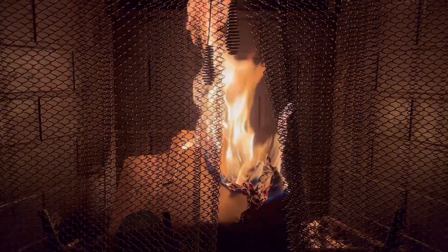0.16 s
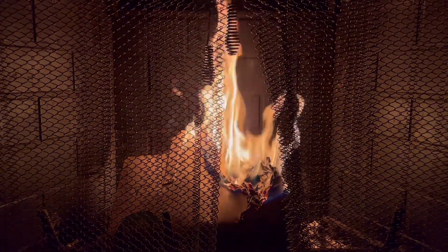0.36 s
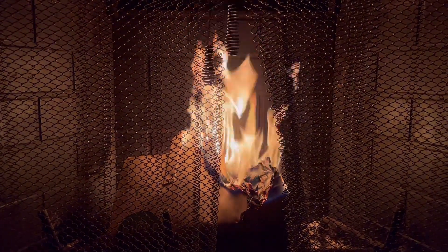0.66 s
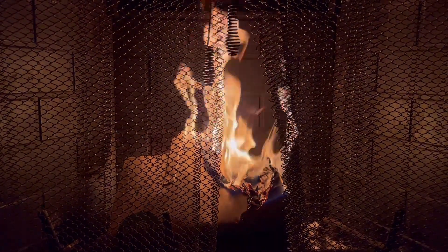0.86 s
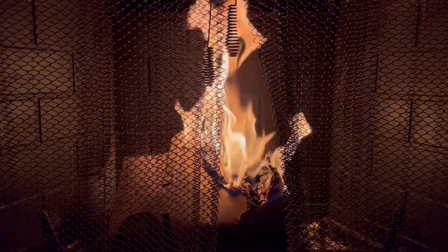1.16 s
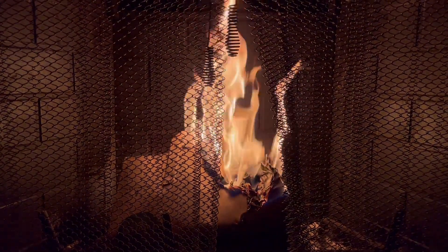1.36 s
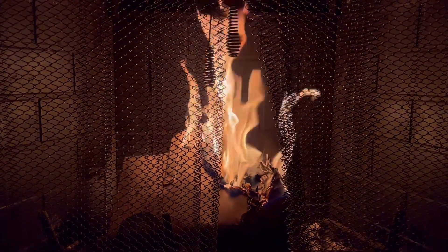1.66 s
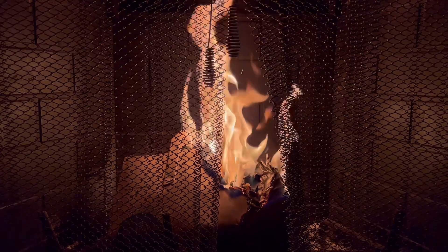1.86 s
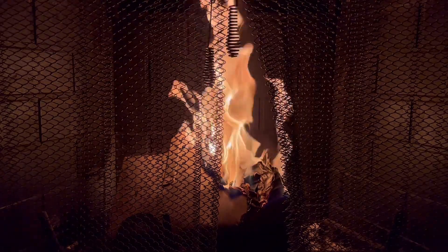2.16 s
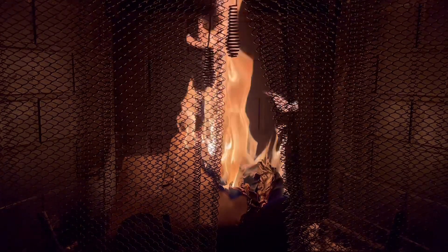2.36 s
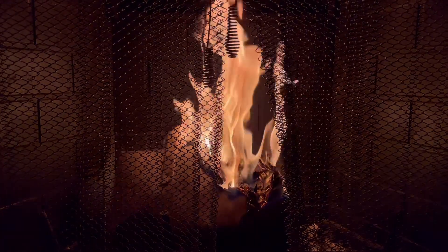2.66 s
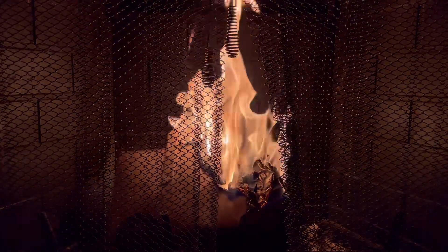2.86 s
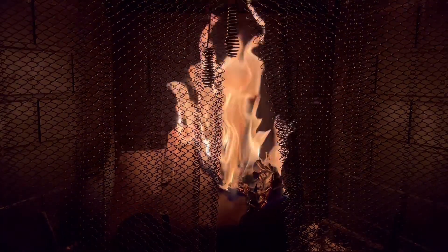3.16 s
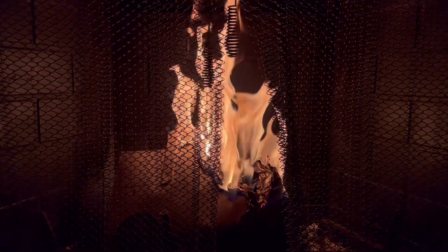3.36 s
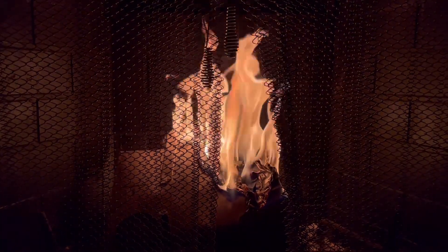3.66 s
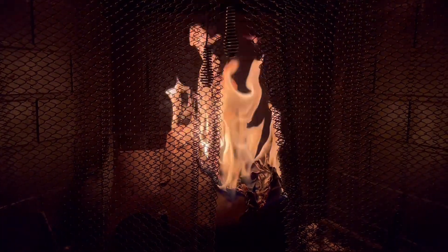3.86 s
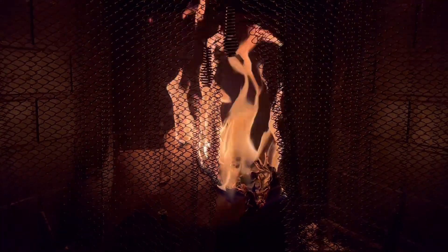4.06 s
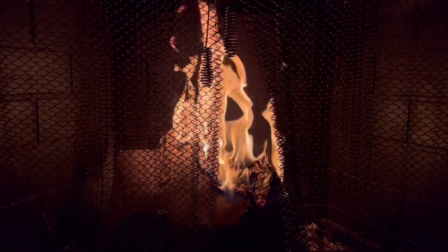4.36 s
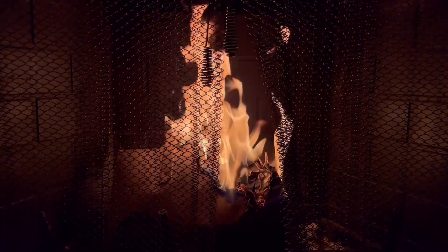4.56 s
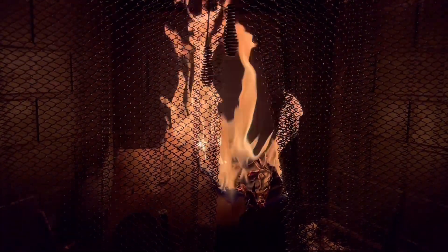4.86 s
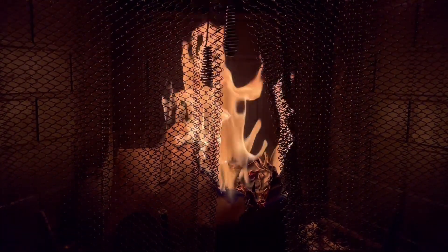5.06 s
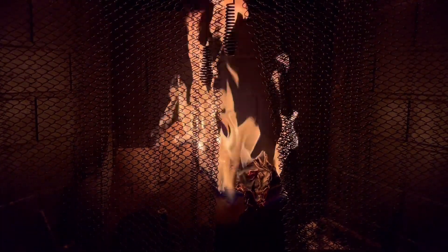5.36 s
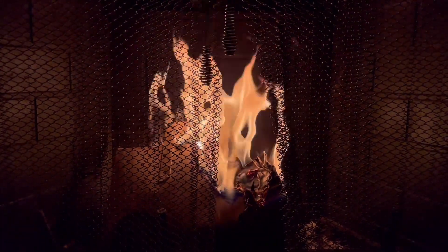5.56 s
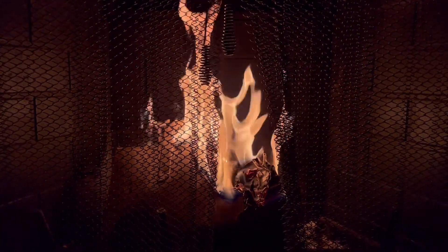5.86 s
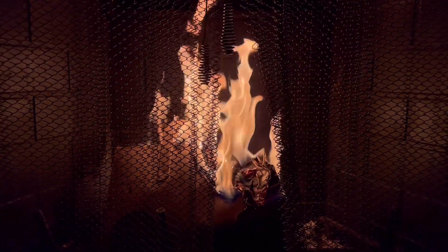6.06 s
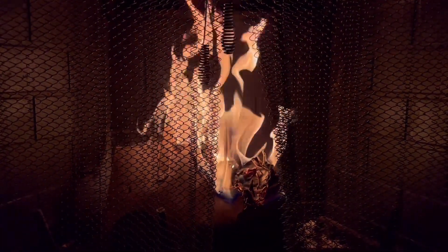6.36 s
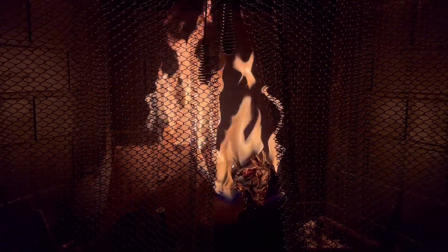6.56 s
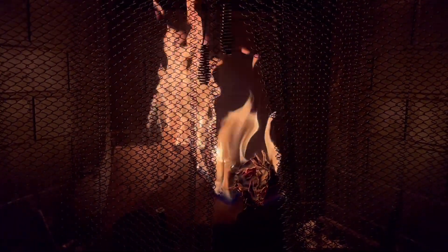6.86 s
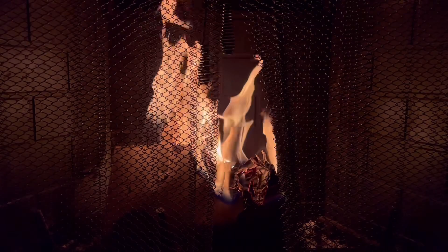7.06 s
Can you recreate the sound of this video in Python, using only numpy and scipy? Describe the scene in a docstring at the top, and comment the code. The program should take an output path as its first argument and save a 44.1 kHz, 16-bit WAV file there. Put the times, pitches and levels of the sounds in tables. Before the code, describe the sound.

Low flames rumble and lick inside a small brick firebox, with soft bassy surges and short thumps of air. Charring sheets hiss and rustle finely, and gas jets sputter briefly. Brittle paper snaps begin lightly, get stronger and crowd together around three to five seconds, then settle into quick crisp ticks. Microphones are close, the sound wide in the treble, with hardly any room echo.

```python
"""A brick fireplace, where crumpled paper burns close to a pair of microphones.
The flames rumble, flutter, leap and puff: shaped noise for the burning, deep swells and short pushes of air.
Charring sheets sizzle and tick, made of noise and tiny bursts; gas jets hiss and sputter in grainy noise.
Brittle paper snaps as a jagged noise burst with two ringing notes; gas pockets pop with a falling note."""
import sys
import numpy as np
from scipy import signal
from scipy.fft import rfft, irfft, next_fast_len
from scipy.io import wavfile
from scipy.ndimage import uniform_filter1d, map_coordinates

SR = 44100
rng = np.random.default_rng(int(sys.argv[2]) if len(sys.argv) > 2 else 0)


def to_wav(s):
    """Save 16-bit WAV."""
    ch = np.atleast_2d(s).T  # columns
    pcm = np.round(np.clip(ch, -1, 1) * 32767)  # PCM
    wavfile.write(sys.argv[1], SR, pcm.astype(np.int16))


N = 318083

BURBLE_DB = 3.5  # how unevenly the bands of a gas jet swell and fade


def flames(rumble_db=0.4, draught_db=-54.5, sputter_db=-5, between_jets_db=-3.5):
    """Turbulent burning: a deep rumble and a sputtering flutter flicker together and pull a draught up the flue."""
    # the size of the flame, heard as rumble: (time [s], level [dB])
    flame_size = [(0.0, -47), (0.6, -46.5), (0.7, -47.5), (1.0, -45.5), (1.4, -47), (2.0, -44.5),
                  (2.2, -46), (2.3, -43.5), (2.8, -45.5), (2.9, -48.5), (3.1, -43.5), (3.81, -46),
                  (4.01, -43), (4.21, -48), (4.41, -43), (5.01, -47), (5.31, -43.5), (5.51, -47),
                  (5.91, -45), (7.21, -47)]
    # how strongly the flames lick and flutter: (time [s], level [dB])
    lick_strength = [(0.0, -64), (2.5, -61), (2.8, -63), (4.41, -60.5), (4.71, -63.5), (5.21, -62.5),
                     (6.61, -63), (7.21, -64)]
    # colours of the rumble, the flutter and the draught: (frequency [Hz], level [dB per Hz])
    rumble_colour = [(20, -6), (32, -19.5), (42, -2), (52, -1.5), (65, -1.5), (85, -5), (115, -8),
                     (140, -11), (190, -12.5), (250, -26), (400, -41), (1000, -88)]
    flutter_colour = [(150, -6), (350, 1), (550, -0.5), (750, -6), (950, -11.5), (1200, -13), (1500, -15.5),
                      (2500, -19.5), (6000, -61)]
    draught_colour = [(60, -23), (130, 0), (200, 2.5), (280, -5.5), (400, -11), (520, -13.5), (700, -36),
                      (1500, -53)]
    rumble_level, = curves(flame_size)
    flutter_level, = curves(lick_strength)
    flicker = wobble(15)

    roar = noise(lambda hz: along(rumble_colour, hz))
    # evened out, so that its slow surges follow the size of the flame
    roar = roar / np.sqrt(np.abs(uniform_filter1d(roar ** 2, size=4000, axis=1)))
    unsteady = amp(0.32 * flicker - 0.1 * wobble(40))
    rumble = amp(rumble_level + rumble_db) * unit(roar * unsteady)

    # the draught follows the flame only in part
    draught_level = draught_db + 0.37 * (rumble_level - rumble_level.mean())
    draught = amp(draught_level) * noise(lambda hz: along(draught_colour, hz))

    flutter = noise(lambda hz: along(flutter_colour, hz))
    sputter = amp(sputter_db) * ticks(flutter_colour, count=420, note_hz=738, spread=0.328,
                                      ring_db=3.5, scatter_db=2.0, t60=0.1)
    licking = amp(flutter_level + between_jets_db + 1.5 * flicker)
    return rumble + patchy(draught + licking * (flutter + sputter), depth_db=1.5)


def surges(swell_s=0.033, waver_hz=6):
    """The flame leaps: each leap is a short swell of the hearth's deep note, wavering in pitch."""
    # leaps of the flame: (time of the peak [s], peak level [dB], note [Hz])
    leaps = [(0.13, -44.5, 62), (0.36, -42.5, 58.3), (0.97, -39, 60), (1.24, -40, 62), (1.84, -41, 67.3),
             (1.99, -40, 56.1), (2.34, -39, 60.1), (2.53, -41, 64.3), (2.76, -43, 55.4), (3.14, -35, 57),
             (3.62, -40, 53), (3.8, -45, 60.3), (4.04, -39.5, 52), (4.5, -42, 63.2), (5.17, -47, 56),
             (5.75, -50, 60), (6.3, -39, 58.5), (6.6, -40.5, 66), (6.8, -41.5, 52.9), (7.15, -40, 53.8)]
    out = np.zeros((2, N))
    t = np.arange(N) / SR
    drift = waver_hz * np.cumsum(wobble(30)) / SR
    for (s, db, hz), phase in zip(leaps, rng.random(len(leaps))):
        near = np.abs(t - s) < 1 / 4
        swell = np.exp(-((t[near] - s) / swell_s) ** 2 / 2)
        cycles = hz * t[near] + drift[near] + phase
        out[0, near] += amp(db) * swell * np.sin(2 * np.pi * cycles)
    return out


def puffs(boom_attack=0.0022):
    """A pocket of gas flares: one smooth push of air between two dips, then the hearth booms."""
    # tongues of flame that catch: (time of the push [s], peak level [dB], half-width of the push [s],
    # boom against the push [dB])
    flares = [(0.448, -33.5, 0.0016, -6), (3.114, -40, 0.0031, -10), (3.557, -26.5, 0.0021, -10),
              (3.707, -31, 0.0017, -11.5), (4.264, -29.5, 0.003, -14), (4.456, -32, 0.0015, -4.5),
              (5.075, -32.5, 0.0018, -18), (5.378, -31, 0.0025, -3)]
    # the hearth's air rings after a puff: (note [Hz], level [dB], time to fall by 60 dB [s])
    hearth_notes = [(58.5, 2, 0.24), (138, -2, 0.21), (186, -1, 0.11)]
    out, lead_in = np.zeros((2, N)), SR // 50
    t = (np.arange(SR // 2) - lead_in) / SR
    after = np.maximum(t, 0)
    for s, db, width, boom_db in flares:
        push = (1 - (t / width) ** 2) * np.exp(-(t / width) ** 2 / 2)
        boom = np.zeros(len(t))
        for hz, level, t60 in hearth_notes:
            note_hz = hz * rng.normal(1, 0.062)  # a little off each time
            boom += amp(level - 60 * after / t60) * np.cos(2 * np.pi * note_hz * t)
        boom *= amp(boom_db) * (1 - np.exp(-after / boom_attack))
        add(out[0], s - lead_in / SR, amp(db) * (push + boom))
    return out


def sizzle(hiss_db=-3.5, rustle_db=-6.0, crackle_db=-13, curl_db=-2.5, between_jets_db=-1.65):
    """Gas hisses out of charring sheets, fibres rustle and crackle; where a jet blows, paper crinkles densely."""
    # how fast the paper chars, heard as sizzle: (time [s], level [dB])
    charring_speed = [(0.0, -69), (0.4, -70), (0.6, -71.5), (1.6, -69), (1.8, -68.5), (2.2, -70.5),
                      (2.5, -67.5), (2.7, -65), (3.91, -66.5), (5.01, -65.5), (5.71, -66), (6.01, -69),
                      (6.21, -67), (7.21, -67)]
    # late on, one curling sheet ticks at a note of its own: (time [s], level [dB])
    curl_strength = [(0, -94), (4.4, -105), (5.0, -69), (6.1, -74), (6.35, -67), (6.8, -73), (7.21, -80)]
    # colour of the sizzle: (frequency [Hz], level [dB per Hz])
    sizzle_colour = [(500, -7), (1200, -6), (1900, -4.5), (2700, -1.5), (3800, -3), (4500, -1), (5300, -4),
                     (7000, -4.5), (9000, -7.5), (10500, -7.5), (12500, -12.5), (15500, -11.5)]
    level, = curves(charring_speed)
    curl_level, = curves(curl_strength)
    steady_db = level + between_jets_db - 0.17 * wobble(17)

    hiss = amp(hiss_db + 3.0 * wobble(35)) * noise(lambda hz: along(sizzle_colour, hz))
    rustle = amp(rustle_db) * ticks(sizzle_colour, count=480, note_hz=4650, spread=0.567,
                                    ring_db=12, scatter_db=6.0, t60=0.053)
    crackle = amp(crackle_db) * ticks(sizzle_colour, count=90, note_hz=4200, spread=0.33,
                                      ring_db=10, scatter_db=4, t60=0.025)
    curl = amp(curl_level + curl_db) * ticks(sizzle_colour, count=260, note_hz=3120, spread=0.06,
                                             ring_db=12, scatter_db=-0.5, t60=0.051)
    jet_hiss = patchy(noise(lambda hz: along(sizzle_colour, hz)), BURBLE_DB)
    crinkle = jets("hiss") * grains(rate=330, t60=0.012) * jet_hiss
    return amp(steady_db) * (hiss + rustle + crackle) + crinkle + curl


def burning_jets():
    """Each jet of gas sputters and burbles as it burns off."""
    # colour of a jet as it burns: (frequency [Hz], level [dB per Hz])
    burning_colour = [(200, -22), (450, 2.5), (600, 3), (750, -0.5), (950, -7), (1300, -10), (2500, -15.5),
                      (6000, -37)]
    burble = patchy(noise(lambda hz: along(burning_colour, hz)), BURBLE_DB)
    return jets("flutter") * grains(rate=260, t60=0.03) * burble


def jets(layer, attack_s=0.0035, release_s=0.021):
    """Gain of all the jets together as they open and die away; layer is "hiss" or "flutter"."""
    # gas escapes and burns off: (start [s], length before the release [s], hiss [dB], flutter [dB])
    gas_escapes = [(1.082, 0.075, -65.5, -59.5), (1.295, 0.037, -74, -87), (1.4, 0.042, -67.5, -67),
                   (1.599, 0.1, -70, -64), (1.742, 0.21, -72, -69.5), (2.292, 0.11, -77, -67.5),
                   (2.507, 0.12, -63.5, -69), (3.378, 0.028, -75, -62), (3.585, 0.11, -69.5, -67),
                   (4.305, 0.32, -67, -70.5), (5.167, 0.19, -68.5, -69.5), (5.454, 0.032, -62, -87),
                   (5.662, 0.032, -62.5, -94)]
    t, gain = np.arange(SR // 2) / SR, np.zeros(N)
    for s, length, hiss_db, flutter_db in gas_escapes:
        opening = np.clip(t / attack_s, 0, 1)
        closing = np.exp(-np.maximum(t - length, 0) / release_s)
        level_db = hiss_db if layer == "hiss" else flutter_db
        add(gain, s, amp(level_db) * opening * closing)
    return gain


def snaps(gain_db=-0.4, t60=0.052, tail_db=-20, tail_t60=0.77, jagged_db=3.5, steep=0.48,
          crack_db=-4, crack_t60=0.006, ring_gain_db=4.5, second_ring_db=-3, ring_t60=0.027,
          ring_attack=0.0003, sheet_db=3, sheet_width=0.14):
    """Brittle paper tears in a jagged build-up and cracks; the sheet rings with two notes, the firebox answers."""
    # snaps of the paper: (time of the peak [s], level before the overall gain [dB], build-up [s], body [dB],
    # ring [Hz], second ring [Hz], ring against the tear before the ring gain [dB])
    paper_snaps = [(0.206, -62, 0.0028, 1, 6590, 6000, -6), (0.385, -54, 0.0011, -18, 2500, 7060, -5),
                   (0.428, -59, 0.00081, -15, 2370, 6900, -7), (0.467, -57, 0.0018, -7, 2500, 6000, -9),
                   (0.742, -59, 0.002, -14, 4220, 2150, -9), (0.786, -62.5, 0.002, -3, 2280, 3400, -8),
                   (0.929, -64, 0.001, -12, 3270, 2500, 2), (1.031, -62, 0.0045, -1, 2280, 3700, -9),
                   (1.122, -60, 0.002, 0, 5510, 4780, 5), (1.144, -63, 0.002, -6, 5510, 4740, 7),
                   (1.178, -64, 0.0022, -6, 4820, 4130, 6), (1.592, -59, 0.00088, -15, 3490, 2450, -4),
                   (1.666, -51, 0.0013, -23, 2970, 4760, -6), (1.747, -45.5, 0.0021, -22, 2540, 4520, -3),
                   (1.767, -53.5, 0.002, -18, 5300, 2520, -7), (1.793, -51.5, 0.0012, -24, 4220, 5210, -2),
                   (1.865, -54, 0.00097, -26, 4090, 4650, 2), (1.893, -40.5, 0.0075, -7, 4480, 2240, -3),
                   (2.434, -43, 0.00048, -25, 6930, 4260, -8), (2.487, -55.5, 0.00081, 2, 5990, 4260, 0),
                   (2.612, -55, 0.003, 10, 4180, 2780, 6), (2.821, -58.5, 0.0011, -17, 4260, 6200, -7),
                   (2.847, -45.5, 0.0013, -10, 3270, 2230, -7), (2.934, -53.5, 0.0017, -2, 5810, 2930, -4),
                   (3.292, -50.5, 0.00074, 5, 6290, 7000, -12), (3.42, -52, 0.0008, 6, 4480, 2990, -1),
                   (3.6, -57.5, 0.001, -8, 4610, 6000, 2), (3.615, -52, 0.00065, 8, 2450, 3270, -6),
                   (3.775, -58.5, 0.0011, -17, 4610, 3140, -8), (3.83, -49.5, 0.0046, -8, 5770, 3130, 1),
                   (4.0431, -43, 0.00053, -3, 3450, 4520, -10), (4.095, -53, 0.0015, -11, 2500, 5700, -5),
                   (4.312, -41.5, 0.0035, -0.5, 6160, 3390, -3.5), (4.426, -50, 0.0021, -6, 2840, 4480, -2),
                   (4.439, -51, 0.0045, -12, 7240, 4540, -8), (4.515, -56, 0.002, -15, 4610, 3100, -6),
                   (4.522, -57, 0.00093, -20, 4610, 3040, -6),
                   (4.686, -43.5, 0.00085, -28, 4570, 3490, -3.5),
                   (4.861, -55.5, 0.00077, -11, 2970, 4950, -3), (4.881, -57.5, 0.002, -10, 2970, 4870, -5),
                   (4.995, -60, 0.001, -14, 4260, 3270, -5), (5.009, -53.5, 0.0023, -7, 2840, 4480, -8),
                   (5.041, -45.5, 0.00063, -3, 4180, 3060, -2), (5.078, -54, 0.0011, 3, 4180, 2970, -1),
                   (5.098, -54.5, 0.0026, -15, 4610, 5510, -8), (5.206, -52, 0.011, 0, 2800, 4300, -3),
                   (5.221, -56, 0.001, -1, 4350, 2710, 1), (5.265, -52.5, 0.002, -21, 6070, 7020, -8),
                   (5.281, -57, 0.002, -14, 3270, 4570, -2), (5.298, -50.5, 0.0015, -9, 6330, 4480, -5),
                   (5.399, -55.5, 0.001, -17, 3010, 4700, 9), (5.489, -55.5, 0.0033, -22, 4570, 5170, -3),
                   (5.772, -54.5, 0.0031, -7, 4180, 3450, -10), (5.888, -56.5, 0.0072, -13, 3140, 6400, -2),
                   (6.137, -52, 0.00098, -15, 3140, 6420, -2.5),
                   (6.175, -56.5, 0.0008, -22, 3190, 5120, -1), (6.194, -55.5, 0.0022, -11, 4180, 3230, -3),
                   (6.204, -57.5, 0.001, -10, 4350, 2890, -9), (6.33, -63, 0.001, -22, 2930, 3490, -1),
                   (6.351, -65, 0.001, -19, 2890, 3700, -1), (6.375, -54, 0.0006, -19, 2930, 5100, 4),
                   (6.3924, -53, 0.0005, -16, 2890, 2110, 2), (6.423, -63, 0.001, -16, 3140, 4350, -7),
                   (6.463, -54, 0.00094, -7, 3790, 4340, 3), (6.531, -51, 0.0005, -2, 3060, 2110, -2),
                   (6.546, -51.5, 0.0012, -3, 3140, 2500, -4), (6.635, -59, 0.0048, -6, 4050, 6200, -7),
                   (6.646, -56.5, 0.0016, -7, 3920, 2950, -5), (6.733, -63, 0.0015, -14, 3320, 5770, 2),
                   (6.773, -59.5, 0.0008, -8, 3100, 5120, -1), (6.795, -56.5, 0.0018, -5, 4950, 4310, -2),
                   (6.835, -58, 0.0008, -8, 3060, 5060, 1), (6.857, -63, 0.0015, -17, 2890, 6370, 3),
                   (7.08, -53, 0.0015, -1, 4780, 2970, -9), (7.092, -59, 0.001, -12, 2840, 6800, -8),
                   (7.107, -54, 0.0022, -7, 4570, 3140, -10)]
    # colour of tearing paper: (frequency [Hz], level [dB per Hz])
    paper_colour = [(120, -34), (450, 16), (800, 5), (1200, 4), (1700, 1.5), (2500, 4), (3600, 1),
                    (4400, 2.5), (5600, 1), (7000, 2), (9500, 1), (12500, -6), (15500, 1.5)]
    out, lead_in = np.zeros((2, N)), SR // 20
    t = (np.arange(SR // 5) - lead_in) / SR
    after = np.maximum(t, 0)
    fall = np.hypot(amp(-60 * after / t60), amp(tail_db - 60 * after / tail_t60))
    crack = (t >= 0) * amp(crack_db - 60 * after / crack_t60)
    for s, db, build_up, body_db, ring_hz, second_hz, ring_db in paper_snaps:
        # small scraps ring higher and snap brighter, 2 dB an octave
        bright_db = 2 * np.log2(ring_hz / 5070)
        tone = [(1300, body_db), (2000, -bright_db / 2), (3500, 0), (5600, 0), (7500, bright_db)]

        def colour(hz):
            """Level of the tear in dB: paper, size of scrap, resonance of the sheet and its folds."""
            sheet = sheet_db * bump(hz, ring_hz, sheet_width * ring_hz)
            folds = 1.5 * ripples(hz, spacing_hz=240)
            return along(paper_colour, hz) + along(tone, hz) + sheet + folds

        burst = noise(colour, size=len(t))
        rise = np.exp(-steep * (np.minimum(t, 0) / max(build_up, 1e-4)) ** 2)
        jagged = unit(uniform_filter1d(rng.standard_normal(len(t)), size=20))
        fractures = unit(amp(jagged_db * jagged))
        tear = (rise * fall * fractures + crack) * burst

        phases = rng.random((2, 2, 1))  # each note starts differently at the two ears
        notes = np.sin(2 * np.pi * (ring_hz * t + phases[0]))
        notes = notes + amp(second_ring_db) * np.sin(2 * np.pi * (second_hz * t + phases[1]))
        ring_fade = amp(ring_db + ring_gain_db - 60 * after / ring_t60)
        ring = ring_fade * (1 - np.exp(-after / ring_attack)) * notes
        # a strong ring takes its share of the level
        snap = amp(db + gain_db) * (tear + ring) / np.hypot(1, amp(ring_db))
        add(out, s - lead_in / SR, snap)
    return out


def pops(fall_s=0.00065, attack=0.00095, thud_t60=0.077, echo_db=-7, echo_t60=0.088,
         overtone_db=-8.0, overtone_t60=0.016):
    """A gas pocket bursts: its note drops as the cavity opens, with an overtone and thud; the bricks scatter it."""
    # popping pockets: (start [s], peak level [dB], first pitch [Hz], last pitch [Hz],
    # time for the note to fall by 60 dB [s], dull thud against the note [dB], overtone [Hz])
    gas_pockets = [(0.8905, -39, 1750, 1117, 0.02, -17, 2120), (1.095, -47, 900, 684, 0.057, -15, 1210),
                   (1.122, -56, 1010, 760, 0.031, -1, 1200), (1.183, -44.5, 900, 600, 0.029, -13, 1110),
                   (2.46, -47.5, 1440, 440, 0.044, -3, 1250), (3.03, -45, 1610, 433, 0.022, -0.5, 1150),
                   (3.1736, -40, 1810, 444, 0.02, -6.5, 1230), (3.548, -42.5, 1710, 450, 0.026, -3.5, 1180),
                   (3.622, -46.5, 1410, 850, 0.016, 0, 1300), (3.695, -52, 1400, 850, 0.035, -1, 1250),
                   (3.826, -41.5, 1940, 470, 0.032, -3, 1050), (4.043, -49, 1800, 910, 0.018, -8, 1530),
                   (4.309, -44.5, 1410, 536, 0.035, -5, 1100), (4.438, -47.5, 1390, 473, 0.04, -2, 1200)]
    # colour of the thud: (frequency [Hz], level [dB per Hz])
    thud_colour = [(120, 2), (250, 13), (500, -1.5), (800, -9), (1250, -5), (1600, -18), (3500, -45)]
    out, t = np.zeros((2, N)), np.arange(SR // 10) / SR
    onset = 1 - np.exp(-t / attack)
    for s, db, first_hz, last_hz, t60, thud_db, overtone_hz in gas_pockets:
        hz = last_hz + (first_hz - last_hz) * np.exp(-t / fall_s)
        note = np.sin(2 * np.pi * np.cumsum(hz) / SR) * onset * amp(-60 * t / t60)
        overtone_fade = amp(overtone_db - 60 * t / overtone_t60)
        note += np.sin(2 * np.pi * overtone_hz * t) * onset * overtone_fade

        # dense random reflections, soft at first, then dying away
        bricks = rng.standard_normal((2, len(t))) * amp(-60 * t / echo_t60) * np.minimum(t / 0.0046, 1)
        bricks = bricks / np.linalg.norm(bricks[0])
        echo = signal.fftconvolve(note[None], bricks, axes=1)[:, :len(t)]

        thud = noise(lambda f: along(thud_colour, f), size=len(t))
        thud = thud * onset * amp(thud_db - 60 * t / thud_t60)
        add(out[0], s, amp(db) * note)
        add(out, s, amp(db) * (amp(echo_db) * echo + thud))
    return out


def firebox(fire):
    """The firebox and its screen strengthen the sound at their narrow resonances."""
    # resonances: (frequency [Hz], half-width [Hz], boost [dB])
    resonances = [(349.2, 8, 6.5), (1170, 22, 2), (2690, 16, 1), (3450, 39, 4), (4360, 35, 1.5)]

    def boost(hz):
        return amp(sum(db * bump(hz, centre, width) for centre, width, db in resonances))

    return filtered(fire, boost)


def microphones(pair):
    """The first signal reaches both ports alike, the second in opposition; the treble arrives out of step."""
    # how alike the two ports hear: (frequency [Hz], likeness [1 = the same])
    likeness = [(50, .99), (150, .96), (300, .92), (600, .55), (1100, .5), (1600, .15), (2500, .5),
                (4400, .85), (7000, .82), (8200, .98), (10000, .75), (11500, .99), (13300, .7),
                (14800, .98)]
    # how far the left port leads: (frequency [Hz], phase [radians])
    left_lead = [(100, 0), (900, .35), (1700, 0), (3000, .3), (4000, 0), (5100, .45), (6300, -.2),
                 (7700, -2.9), (8800, -3.3), (10900, -6.2), (12300, -6.4), (14100, -9.3), (16000, -9.5)]
    # left minus right: (frequency [Hz], level [dB])
    left_balance = [(100, .35), (350, .6), (700, 1.6), (1400, 1), (2800, 2.3), (5500, 1), (9000, 0)]
    half = np.array([[1], [-1]]) / 2

    def shares(hz):
        turn = np.arccos(np.clip(along(likeness, hz), -1, 1)) / 2
        return np.array([np.cos(turn), np.sin(turn)])

    def ports(hz):
        return amp(half * along(left_balance, hz)) * np.exp(1j * half * along(left_lead, hz))

    mid, side = filtered(pair, shares)
    return filtered(np.array([mid + side, mid - side]), ports)


def ticks(spectrum, count, note_hz, spread, ring_db, scatter_db, t60):
    """Tiny noise bursts at random moments, each with its own size and note, quickly die away; rms 1."""
    out, t = np.zeros((2, N)), np.arange(SR // 30) / SR
    hz = np.fft.rfftfreq(len(t), 1 / SR)
    shape = amp(-60 * t / t60) * (1 - np.exp(-t / 0.00028))
    strength, detune = rng.standard_normal((count, 2)).T
    note = note_hz * np.exp(spread * detune)[:, None, None]
    colour = amp(along(spectrum, hz) + ring_db * bump(hz, note, 0.046 * note))
    bursts = irfft(rfft(rng.standard_normal((count, 2, len(t)))) * colour, len(t))
    for s, size, burst in zip(rng.uniform(0, N / SR, count), strength, bursts):
        add(out, s, amp(scatter_db * min(size, 1.7)) * shape * unit(burst))
    return unit(out)


def grains(rate, t60):
    """A gain of rms 1 made of many tiny bursts, rate a second, each dying away."""
    fractures = (rng.random(N) < rate / SR) * rng.uniform(0, 1, N)
    power = signal.lfilter([1], [1, -amp(-120 / (t60 * SR))], fractures)
    return unit(np.sqrt(np.abs(uniform_filter1d(power, size=70))))


def patchy(x, depth_db):
    """Eddies: each narrow band swells and fades on its own."""
    bands = signal.stft(x, nperseg=1024)[2]
    field = rng.standard_normal(bands.shape[1:])
    field = uniform_filter1d(field, size=3, axis=0)  # neighbouring bands
    field = uniform_filter1d(field, size=4, axis=1)  # neighbouring moments
    gain = unit(amp(depth_db * unit(field)))
    return signal.istft(bands * gain, nperseg=1024)[1][:, :N]


def bump(hz, centre, width):
    """A resonance peak of height 1."""
    return 1 / (1 + ((hz - centre) / width) ** 2)


def ripples(hz, spacing_hz):
    """Random peaks and dips along frequency: every crumpled fold rings differently."""
    return map_coordinates(rng.standard_normal(256), [hz / spacing_hz], mode="wrap")


def amp(db):
    """Decibels to gain."""
    return 10 ** (np.asarray(db) / 20)


def unit(x):
    """x at rms 1."""
    return x / np.sqrt(np.mean(x ** 2) + 1e-20)


def along(points, hz):
    """(Hz, value) points read on a log axis."""
    f, v = np.transpose(points)
    return np.interp(np.log(hz + 1), np.log(f + 1), v)


def curves(rows):
    """One value per sample for each column after the time."""
    s, *cols = np.transpose(rows)
    return [np.interp(np.arange(N) / SR, s, c) for c in cols]


def wobble(rate):
    """A smooth random curve, rate knots a second."""
    knots = rng.standard_normal(int(N * rate / SR) + 4)
    return map_coordinates(knots, [np.arange(N) * rate / SR])


def filtered(x, response):
    """x with each frequency multiplied by the response."""
    n = x.shape[-1]
    m = next_fast_len(n + n // 8)
    return irfft(rfft(x, m) * response(np.fft.rfftfreq(m, 1 / SR)), m)[..., :n]


def noise(colour, size=N):
    """Two unrelated noises of rms 1 together; colour gives dB for each frequency."""
    return unit(filtered(rng.standard_normal((2, size)), lambda hz: amp(colour(hz))))


def add(track, s, sound):
    """Mix a sound into the track from time s on."""
    start = int(np.clip(round(s * SR), 0, N - 1))
    track[..., start:start + sound.shape[-1]] += sound[..., :N - start]


def scene():
    """The whole fire, coloured by the firebox and heard from in front of the screen."""
    fire = flames() + surges() + puffs() + sizzle() + burning_jets() + snaps() + pops()
    return microphones(firebox(fire))


def record(dry, low_cut_hz=33, top_hz=15830):
    """The recorder cuts the deepest bass and keeps nothing above its band limit."""
    def response(hz):
        bass_cut = hz ** 4 / np.hypot(hz ** 4, low_cut_hz ** 4)
        return bass_cut * (hz < top_hz)

    return filtered(dry, response)


dry = scene()
out = record(dry)
to_wav(out)
```